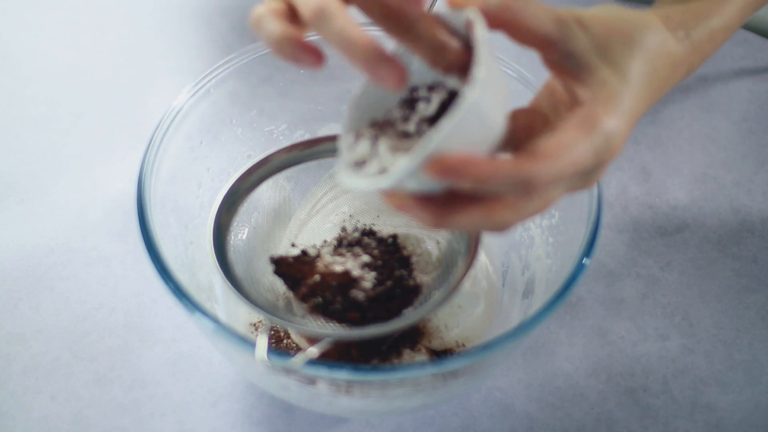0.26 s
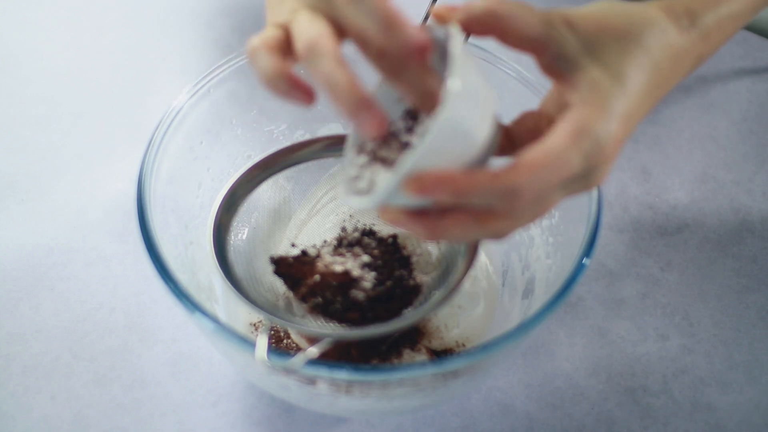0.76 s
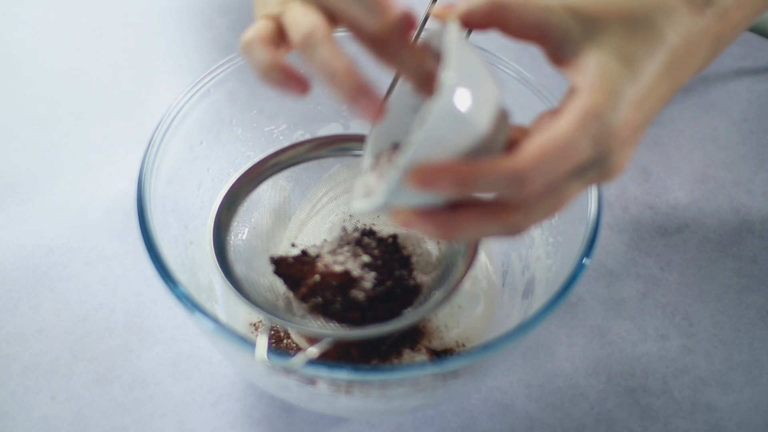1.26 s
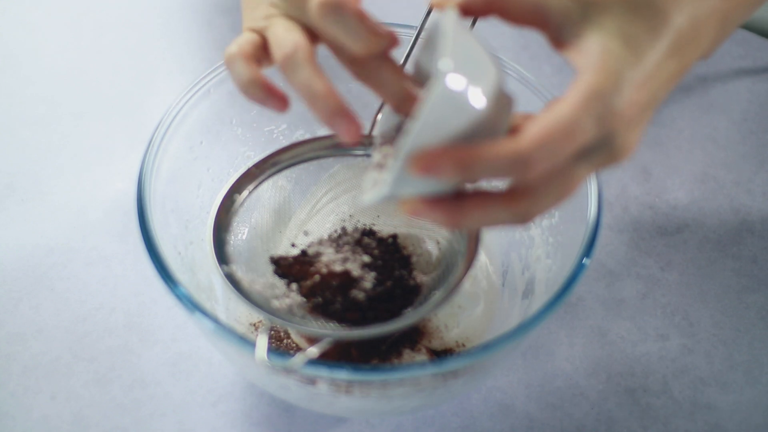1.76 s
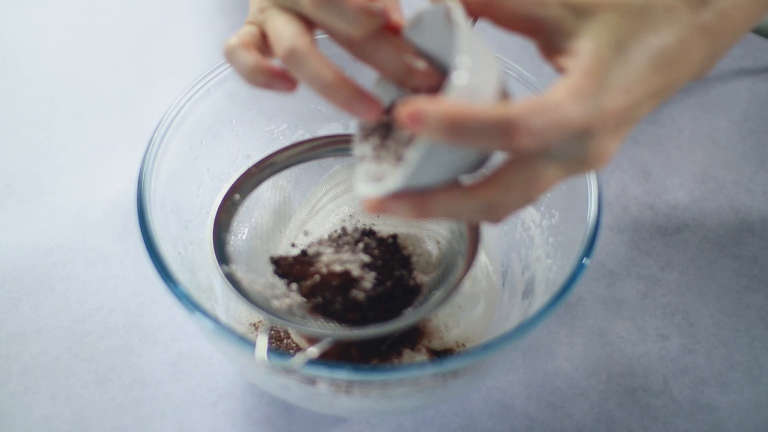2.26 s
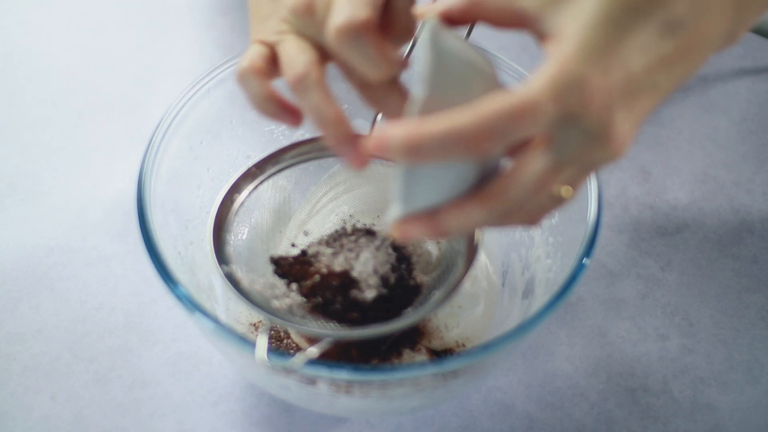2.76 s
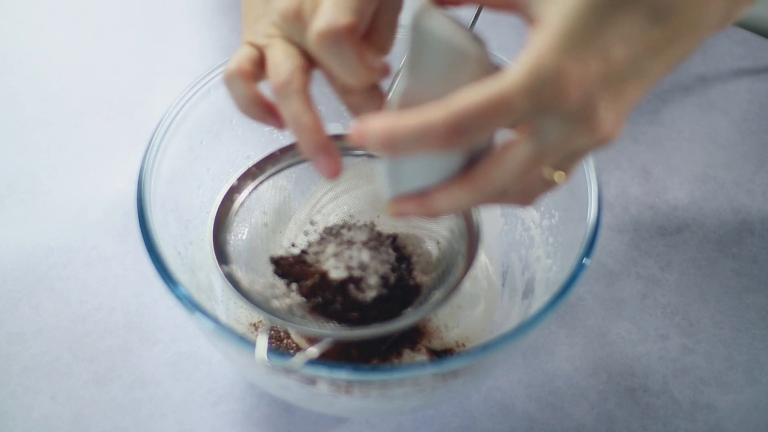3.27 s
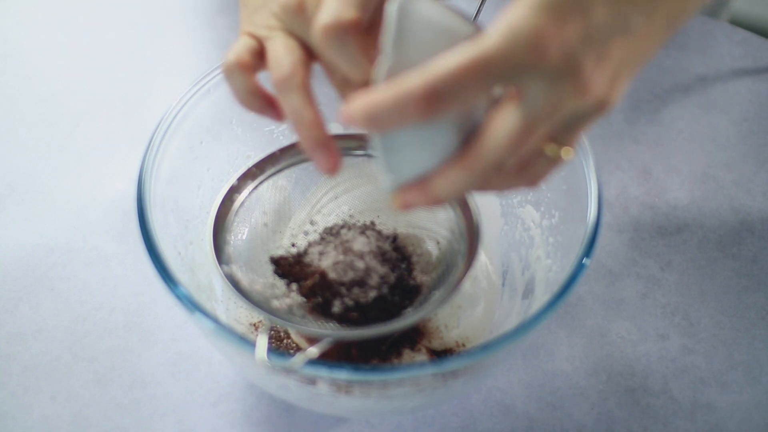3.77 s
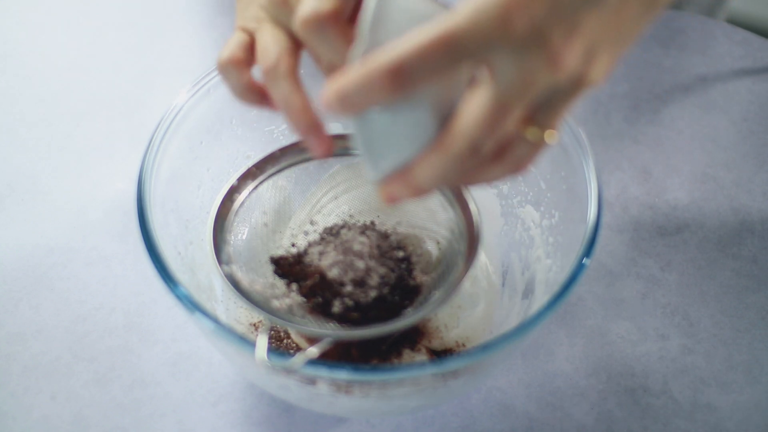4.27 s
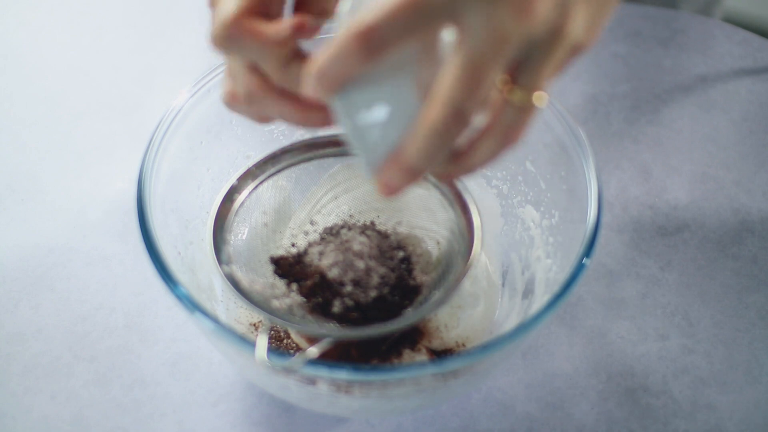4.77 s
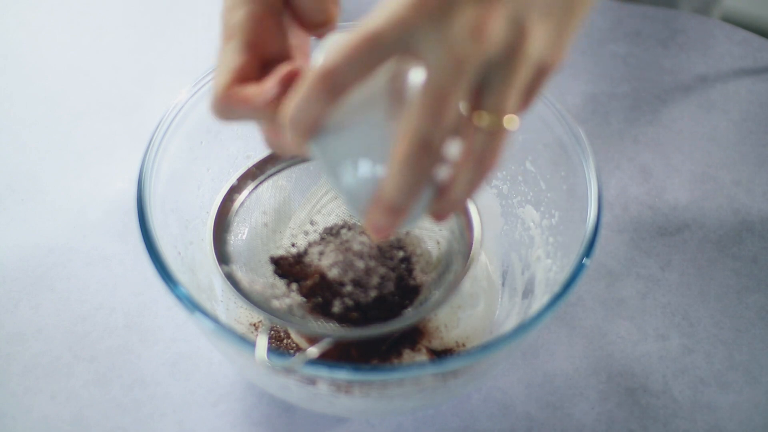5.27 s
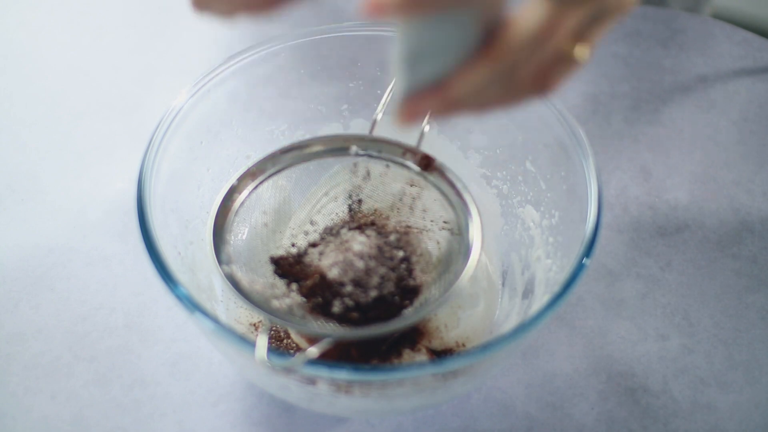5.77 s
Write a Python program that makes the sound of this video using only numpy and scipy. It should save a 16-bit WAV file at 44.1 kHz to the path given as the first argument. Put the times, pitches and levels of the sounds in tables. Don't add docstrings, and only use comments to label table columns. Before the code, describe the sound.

Fingernail ticks and soft scrapes on a small porcelain cup, then five dull knocks shake out powder over a sieve and glass bowl in a quiet kitchen.

```python
import sys
import numpy as np
from scipy import signal
from scipy.fft import rfft, irfft
from scipy.io import wavfile
from scipy.ndimage import uniform_filter1d

SR = 44100
rng = np.random.default_rng(int(sys.argv[2]) if len(sys.argv) > 2 else 0)


def rack_gain(trim_db):
    fader = np.asarray(trim_db, float)
    return 10 ** (fader / 20)


def put_to_file(sound):
    columns = np.atleast_2d(sound).T
    safe = np.clip(columns, -1, 1)
    whole_steps = np.round(safe * 32767)
    wavfile.write(sys.argv[1], SR, whole_steps.astype(np.int16))


N = 265923

NAIL_TICKS = [(0.829, -31, -39, -15, -3), (0.9113, -47, -26, -29, -12), (1.305, -36, -39, -36, -9),
              (1.3548, -53, -25, -9, 3), (1.5368, -49, -26, -23, -21), (1.583, -60, -16, -17, -16),
              (1.8372, -58, -6, -15, -16), (2.0627, -15.5, -1.5, -59, -9.5), (2.1794, -55, -14, -32, -19),
              (2.326, -60, -5, -1.5, 1.5), (2.786, -56, -4.5, -3, -12), (3.0068, -25.5, -3, -17, -8.5),
              (3.3241, -43, -15, 2, -4.5), (3.7808, -21, -5, 13, -2.5), (3.9978, -30, -26, -20, -15)]
# start in seconds, level in dB, centre in Hz, width as a share of the centre, time to fall 60 dB
# in seconds.
NOISE_BURSTS = [(0.8283, -43.5, 1200, 1.8, 0.0075), (1.1247, -59, 1600, 0.51, .004),
                (2.6590, -8, 6600, 0.6, 0.0098), (2.6592, -32, 2900, 0.53, 0.029),
                (3.7805, -49.5, 503, 0.7, 0.0013), (4.7407, -59.5, 13000, .6, .004),
                (4.9555, -29.5, 820, 0.23, 0.0071), (5.1200, -11.5, 403.5, 0.67, 0.0074),
                (5.0950, -20.5, 4960, 0.84, 0.062)]
FOOT_KNOCKS = [
    (4.9550, -17, -32.5, -4, 3),
    (5.1195, -3, -8, -19, -8.5),
    (5.2678, -7.5, -6, -33, -11.5),
    (5.4231, -6.5, -7, -23.5, -3),
    (5.5796, -12, -8.5, -34.5, -12.5),
]
# pitch in Hz, time to fall 60 dB in seconds,
# level in dB against the air in the cup.
HAND_AND_CUP = [(409, .006, -40.5), (1070, 0.006, -14.5), (2380, 0.00364, -2)]
FINGER_RUBS = [(.14, 0.19, -75.5, -12, 0), (.37, .06, -80, -9, -10), (.63, .08, -85, -5, -6),
               (.68, 0.12, -83, 4, 4), (1.63, 0.087, -80, -5.5, 7), (1.79, 0.12, -69.5, -11, -9),
               (1.95, 0.14, -84, 2, 3), (2.24, 0.23, -61, -14, -11), (2.46, .05, -73, -12, -17),
               (2.56, 0.15, -75, -3, -2), (2.85, 0.16, -63, -19, -1), (3.58, 0.083, -81.5, -5.5, -19),
               (3.85, 0.05, -80, 5.5, -9), (4.08, .1, -72, -7, -3), (4.3, .11, -73.5, -1, -12),
               (4.5, .14, -69.5, 0.5, -9), (4.71, .1, -81, 9, -2)]
# pitch in Hz, width in Hz, level in dB.
SQUEAK_TONES = [(2990, 250, -62), (4550, 300, -58), (6000, 200, -68)]
# start in seconds, level in dB, centre in Hz.
POWDER_SPRAYS = [(0.828, -55.5, 8400), (1.305, -61, 8400), (1.537, -68, 8160), (2.063, -47, 7300),
                 (2.659, -48.5, 6940), (3.009, -55, 7500), (3.325, -72, 8400), (3.782, -56, 6700),
                 (3.999, -62, 7900), (4.96, -51.5, 6500), (5.123, -46, 6000), (5.269, -57.5, 6000),
                 (5.425, -49.5, 6000), (5.581, -64, 5500)]
# band centre in Hz, time to fall 60 dB in seconds, level in dB.
KITCHEN_BANDS = [(250, 0.27, -29.5), (700, 0.21, -25.5), (1820, 0.39, -30.5), (3673, 0.27, -21),
                 (5500, 0.22, -24), (7500, 0.36, -22), (10140, 0.22, -26.5), (14000, .22, -24)]
# pitch in Hz, width in Hz, level in dB.
GLASS_BOWL = [(610, 14, -10.5), (1805, 49, -7), (2170, 60, -11), (1330, 97, -4)]
# frequency in Hz, level in dB per Hz.
HISS_COLOUR = [(12, -39), (20, -10), (100, -4.5), (234, -9.5), (388, -7.5), (700, -9.5), (4300, -11),
               (16000, -18)]
# pitch in Hz, width in Hz, early level in dB, late level in dB.
FAR_HUMS = [(28, 6.9, -95, -95), (80.2, 6.5, -98, -93.5), (615, 51, -86, -83.5), (1367, 140, -80.5, -85.5),
            (2310, 60, -79, -105), (4295, 290, -83, -86)]
# closest moment in seconds, half length in seconds, lift in dB.
VEHICLES = [
    (.55, 0.96, 8.5),
    (2.348, .35, 5),
    (4.08, 0.74, 8.5),
]

# pitch in Hz, time to fall 60 dB in seconds
THUD, FIRST, SECOND = (1710, 0.0074), (2600, 0.032), (3745, 0.037)
THIRD, FOURTH, FIFTH = (7456, 0.019), (11230, 0.016), (12230, 0.05)
CAVITY = (690, 0.012)
# centre in Hz, time to fall 60 dB in seconds
DULL_SNAP, BRIGHT_SNAP, AIR_SNAP = (5400, 0.008), (9000, 0.010), (14000, 0.007)


def unit(x):
    return x / np.sqrt(np.mean(x ** 2))


def die_away(t, t60):
    return np.exp(-np.log(1000) * t / t60)


def resonate(x, hz, width_hz):
    return signal.lfilter(*signal.iirpeak(hz, hz / width_hz, fs=SR), x)


def noise_tone(hz, width_hz):
    return unit(resonate(rng.standard_normal(N), hz, width_hz))


def steep(x, hz, order=2):
    return signal.sosfiltfilt(signal.butter(order, hz, "high", fs=SR, output="sos"), x)


def walk(rate):
    k = int(SR / rate)
    levels = np.repeat(rng.standard_normal(N // k + 1), k)
    return uniform_filter1d(uniform_filter1d(levels, k), k)[:N]


def add(out, s, x):
    i = int(s * SR)
    out[i:i + len(x)] += x[:N - i]


def ring(mode, db, chance, rise=0.00029, stray=0.0019):
    hz, t60 = mode
    t = np.arange(4096) / SR
    fade = (1 - np.exp(-t / rise)) * die_away(t, t60)
    return rack_gain(db) * fade / fade.max() * np.sin(2 * np.pi * hz * (1 + stray * chance) * t)


def snap(mode, db, noise, spread=0.5, grit=0.11):
    hz, t60 = mode
    t = np.arange(len(noise)) / SR
    burst = grit * noise * die_away(t, t60)
    burst[0] = 1
    burst = resonate(burst, hz, spread * hz)
    burst = resonate(burst, hz, 2 * spread * hz)
    burst = signal.lfilter(*signal.butter(2, 0.37 * hz, "high", fs=SR), burst)
    return rack_gain(db) * burst / np.abs(burst).max()


def ticks():
    out = np.zeros(N)
    for s, db, second, first, bright in NAIL_TICKS:
        c, noise = rng.standard_normal(4), rng.standard_normal((3, 4096))
        wall = ring(THIRD, db, c[0], rise=0.00032)
        wall += ring(SECOND, db + second, c[1])
        wall += ring(THUD, db + first, c[2], stray=0.062)
        wall += ring((2900, 0.005), db + first - 17.5, c[2], stray=0.078)
        wall += ring(FOURTH, db + second - 14, c[3])
        wall += ring(FIFTH, db + second / 2 - 25, c[3])
        edge = snap(DULL_SNAP, db + second + 0.22 * first + 6.5, noise[0])
        edge += snap(BRIGHT_SNAP, db + bright, noise[1], spread=0.17)
        edge *= rack_gain(2 * min(db + 42, 0))
        air = snap(AIR_SNAP, db + second - 9.5, noise[2], spread=0.28, grit=0.31)
        add(out, s, wall + edge + air)
    return steep(out, 1860)


def noise_bursts():
    out = np.zeros(N)
    for s, db, hz, share, t60 in NOISE_BURSTS:
        add(out, s, snap((hz, t60), db, rng.standard_normal(4096), spread=share))
    return out


def knocks():
    out = np.zeros(N)
    for s, db, cavity, second, dull in FOOT_KNOCKS:
        third = second + 1.5
        c, noise = rng.standard_normal(4), rng.standard_normal((3, 4096))
        add(out, s - 0.0001, -ring(CAVITY, db + cavity, c[0], rise=0.0008, stray=0.027))
        for hz, t60, less_db in HAND_AND_CUP:
            add(out, s + 0.00093, ring((hz, t60), db + cavity + less_db, c[2], stray=0.027))
        wall = ring(THUD, db, c[1], rise=0.0001, stray=0.02)
        wall += ring(FIRST, db - 30.5, c[1])
        wall += ring(SECOND, db + second, c[2])
        wall += ring(THIRD, db + third, c[3])
        wall += ring(FOURTH, db + third - 17, c[3])
        edge = snap(DULL_SNAP, db + dull, noise[0], spread=0.62)
        edge += snap(BRIGHT_SNAP, db + dull - 22.5, noise[1])
        edge += snap(AIR_SNAP, db + dull - 18, noise[2], grit=0.26)
        add(out, s + 0.00082, wall + edge)
    worktop_echo = rack_gain(-17.5) * np.roll(out, int(0.00172 * SR))
    wall_hz = 900
    wall_echo = rack_gain(-17) * np.roll(resonate(out, wall_hz, 1.3 * wall_hz), int(0.0092 * SR))
    return out + worktop_echo + wall_echo


def rubs(grains_per_s=1500, size_db=2.5):
    out, t = np.zeros(N), np.arange(N) / SR
    hits = rng.random(N) < grains_per_s / SR
    grit = rng.standard_normal(N) * hits * rack_gain(size_db * rng.exponential(size=N))
    third = unit(resonate(grit, THIRD[0], 110))
    fifth = unit(resonate(grit, FIFTH[0], 260))
    dust = unit(resonate(rng.standard_normal(N) + 3 * grit, 10570, 9400))
    for s, length, db, fifth_db, dust_db in FINGER_RUBS:
        arch = np.cos(np.pi * np.clip((t - s) / length, -0.5, 0.5)).clip(0)
        touch = arch ** 1.7
        out += touch * rack_gain(db) * (third + rack_gain(fifth_db) * fifth + rack_gain(dust_db) * dust)
    return out


def squeak(start_s=5.377, length_s=0.034, rough_db=5):
    t = np.arange(N) / SR
    arch = np.sin(np.pi * np.clip((t - start_s) / length_s, 0, 1)) ** 0.5
    grip = arch * rack_gain(rough_db * walk(100))
    tones = np.zeros(N)
    for hz, width_hz, db in SQUEAK_TONES:
        tones += rack_gain(db) * unit(resonate(resonate(rng.standard_normal(N), hz, width_hz), hz, width_hz))
    return grip * tones


def sprays(top_hz=10300, t60=0.38):
    out, t = np.zeros(N), np.arange(SR // 3) / SR
    for s, db, hz in POWDER_SPRAYS:
        width_hz = 1.7 * (top_hz - hz)
        patter = resonate(rng.standard_normal(len(t)), hz, width_hz)
        patter = unit(resonate(patter, hz, 0.93 * width_hz))
        add(out, s, rack_gain(db) * patter * np.minimum(t / 0.003, 1) * die_away(t, t60))
    return out


def halo(x, spread_s=0.0017):
    t = np.arange(-800, 801) / SR
    blur = rng.standard_normal(len(t)) * np.exp(-np.abs(t) / spread_s)
    return rack_gain(-11.5) * signal.fftconvolve(x, blur / np.sqrt(np.sum(blur ** 2)), "same")


def kitchen(x, first_s=0.00035, rise_s=0.0012):
    t = np.arange(SR // 2) / SR
    lump_levels = np.repeat(rng.standard_normal(len(t) // 30), 30)
    lumps = rack_gain(5 * np.exp(-t / 0.04) * lump_levels)
    noise = rng.standard_normal(len(t)) * lumps * np.clip((t - first_s) / rise_s, 0, 1)
    spectrum = rfft(noise)
    centres = np.log(np.array(KITCHEN_BANDS)[:, 0])
    bins = np.log(np.fft.rfftfreq(len(t), 1 / SR) + 1)
    tail = np.zeros(len(t))
    for k, (hz, t60, db) in enumerate(KITCHEN_BANDS):
        share = np.interp(bins, centres, np.arange(len(centres)) == k)
        tail += rack_gain(db) * irfft(spectrum * share, len(t)) * die_away(t, t60)
    return signal.fftconvolve(x, tail / 10)[:N]


def bowl(walls):
    return sum(rack_gain(db) * resonate(walls, hz, width_hz) for hz, width_hz, db in GLASS_BOWL)


def hiss(fade_s=5.5):
    hz, db = np.transpose(HISS_COLOUR)
    bins = np.log(np.fft.rfftfreq(N, 1 / SR) + 1)
    colour = rack_gain(np.interp(bins, np.log(hz), db))
    out = rack_gain(-68) * unit(irfft(rfft(rng.standard_normal(N)) * colour, N))
    early = np.exp(-np.arange(N) / SR / fade_s)
    for centre_hz, width_hz, early_db, late_db in FAR_HUMS:
        hum_db = late_db + (early_db - late_db) * early + 3 * walk(4.9)
        out += noise_tone(centre_hz, width_hz) * rack_gain(hum_db)
    return out * rack_gain(0.92 * walk(0.75))


def outside():
    t = np.arange(N) / SR
    lift_db = sum(db * np.exp(-((t - s) / half) ** 2) for s, half, db in VEHICLES)
    rumble_db = -88 + lift_db + 2.2 * walk(3.4)
    drone_db = -84 + 0.3 * lift_db + 1.7 * np.tanh(1.1 * walk(6))
    return noise_tone(55, 80) * rack_gain(rumble_db) + noise_tone(320, 110) * rack_gain(drone_db)


def scene():
    cup = steep(ticks() + noise_bursts() + knocks() + rubs() + squeak(), 350, order=3)
    walls = kitchen(cup)
    mix = cup + halo(cup) + sprays() + walls + bowl(walls) + hiss() + outside()
    return mix[None]


def roll_off(x):
    return signal.sosfilt(signal.butter(12, 16460, fs=SR, output="sos"), x)


def record(dry):
    top_cut = signal.ellip(6, 0.1, 30, 15900, fs=SR, output="sos")
    mix = signal.sosfiltfilt(top_cut, np.clip(dry, -1, 1))
    return roll_off(mix)


dry = scene()
out = record(dry)
put_to_file(out)
```